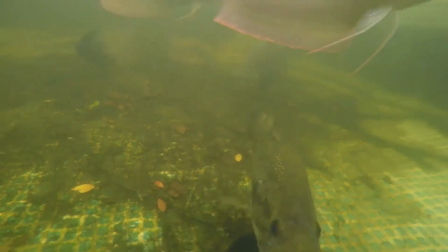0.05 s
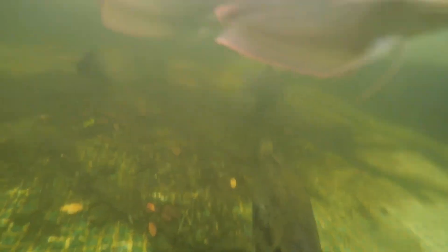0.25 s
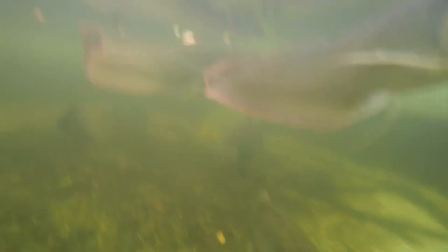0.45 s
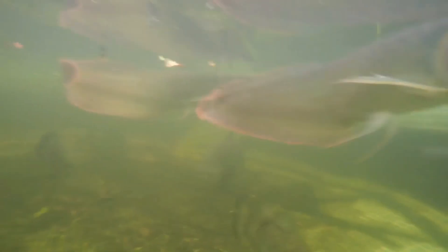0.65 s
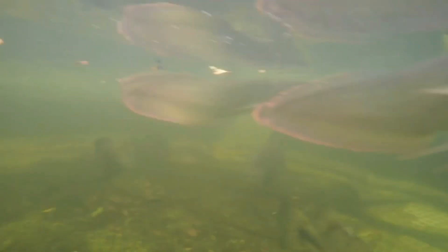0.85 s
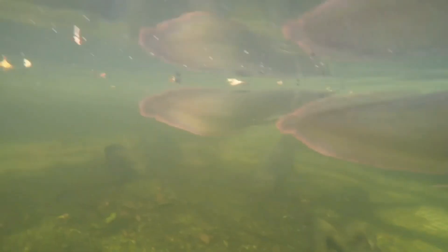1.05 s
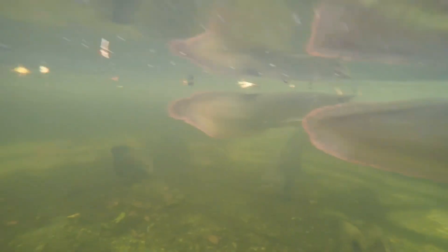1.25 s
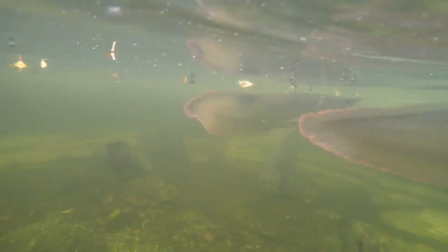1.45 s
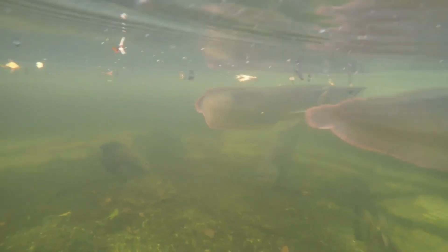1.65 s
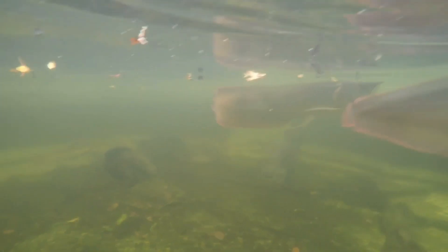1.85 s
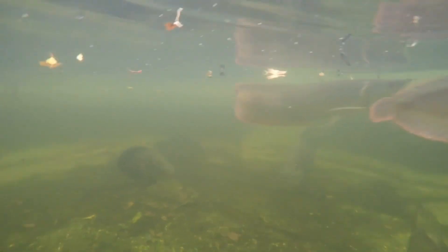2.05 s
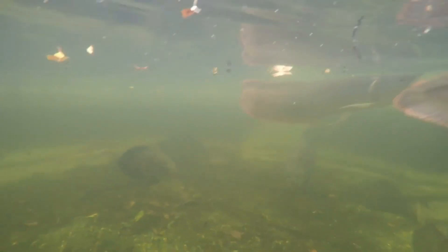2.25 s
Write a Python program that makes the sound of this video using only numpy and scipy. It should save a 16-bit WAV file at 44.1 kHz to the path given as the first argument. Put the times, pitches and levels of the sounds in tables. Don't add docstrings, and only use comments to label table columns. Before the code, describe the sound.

Handling knocks on a sealed plastic housing under water, heard from inside. A faint, buzzy pump hiss and fine watery fizz run throughout. A tick at 0.17 s and a knock at 0.25 lead to brief rubbing; hollow knocks and dull taps cluster from 0.45 to 0.75 amid low sloshing shoves. Bubbles ping faintly. A ringing knock lands at 1.15, then quieter hiss, and a sharp bright click at 1.8.

```python
import sys
import numpy as np
from scipy import signal
from scipy.fft import rfft, irfft
from scipy.io import wavfile
from scipy.ndimage import uniform_filter1d, map_coordinates

SR = 44100
rng = np.random.default_rng(int(sys.argv[2]) if len(sys.argv) > 2 else 0)


def makeup_ratio(level_db):
    decades = np.asarray(level_db, float) / 20
    return 10 ** decades


def unload_audio(sound):
    columns = np.transpose(np.atleast_2d(sound))
    steps = np.round(np.clip(columns, -1, 1) * 32767)
    wavfile.write(sys.argv[1], SR, steps.astype(np.int16))


N = 101429


def evened(x):
    return x / np.sqrt(np.mean(x ** 2) + 1e-20)


def along(curve):
    return np.interp(np.arange(N) / SR, *np.transpose(curve))


def coloured(x, points):
    f, db = np.transpose(points)
    hz = np.fft.rfftfreq(len(x), 1 / SR)
    gain = makeup_ratio(np.interp(np.log(hz + 1), np.log(f + 1), db, left=-60))
    return evened(irfft(rfft(x) * gain, len(x)))


def slow(rate_hz):
    t = np.arange(0, N + 64, 64) / SR
    v = 0
    for f in np.geomspace(rate_hz / 20, rate_hz, num=16):
        v = v + np.sin(2 * np.pi * (f * t + rng.random())) / np.sqrt(f)
    return np.interp(np.arange(N) / SR, t, evened(v))


def resonate(x, hz, width_hz):
    r = np.exp(-np.pi * width_hz / SR)
    return 2 * signal.lfilter([1 - r], [1, -r * np.exp(2j * np.pi * hz / SR)], x).real


def ring(hz, t60, rise_s=0.000063, glide=0.):
    t = np.arange(round(t60 * SR) + 1) / SR
    return (1 - np.exp(-t / rise_s)) * makeup_ratio(-60 * t / t60) * np.sin(2 * np.pi * hz * t * (1 + glide * t))


def add(mix, s, sound):
    part = mix[round(s * SR):][:len(sound)]
    part += sound[:len(part)]


def pump():
    # time_s, level_db
    pump_level = [(0, -41), (.25, -44), (.4, -45), (.6, -46), (.83, -44), (1.04, -48.5), (1.2, -49),
                  (1.4, -46.5), (1.64, -53), (1.85, -50), (2.05, -46.5), (2.3, -43)]
    # pitch_hz, width_hz, level_db
    pond = [(1501, 62, -16), (1804, 27, -13.5), (1964, 57, -11.5), (2150, 17.5, -9), (2260, 56, -12),
            (2440, 52, -3.5), (2600, 23.8, 0.5), (2712, 39, -2), (2910, 22, -10), (3060, 70, -5),
            (3198, 73, 0), (3290, 44, -9), (3644, 98, -8.5), (4650, 204, -18)]
    # time_s, shift_share
    sag = [(0, 0.0042), (1.1, -0.0019), (1.5, -.007), (2.3, -0.0074)]
    bursts_per_s, wander_share, burst_turns = 118.5, .02, .28
    weak_db, uneven_db, pulsed_share = -0.5, 1.5, .72
    drift_db, wide_hz, wide_db = 3.5, 1115, -3.5

    turns = np.cumsum(bursts_per_s * (1 + wander_share * slow(30))) / SR
    burst_db = weak_db * (np.floor(turns) % 2)
    burst_db = burst_db + uneven_db * rng.standard_normal(999)[turns.astype(int)]
    gate = np.exp(-(turns % 1) / burst_turns) * makeup_ratio(burst_db)
    drive = (1 - pulsed_share + pulsed_share * evened(gate)) * rng.standard_normal(N)

    modes = np.zeros(N)
    for k, (hz, width_hz, db) in enumerate(pond):
        mode = resonate(resonate(drive, hz, 0.77 * width_hz), hz, 0.77 * width_hz)
        modes += (-1) ** k * makeup_ratio(db + drift_db * slow(5.34)) * mode
    stretched = np.cumsum(1 + along(sag))
    modes = map_coordinates(modes, [stretched - 1], order=3, mode="nearest")
    wide = resonate(resonate(drive, 2800, wide_hz), 2800, wide_hz)
    buzz = evened(evened(modes) + makeup_ratio(wide_db) * evened(wide))
    return makeup_ratio(along(pump_level) + 1.85 * slow(11)) * buzz


def wash():
    # pitch_hz, level_db
    wash_colour = [(71, -25), (120, -10.5), (1360, -21), (3100, -3.5), (4120, -18.5), (10200, -25.5),
                   (14000, -28.5), (15300, -48)]
    # centre_s, half_width_s, lift_db
    surges = [(.14, 0.015, 5.5), (.2, 0.062, 4), (0.355, 0.024, 6.5), (0.467, 0.022, 7.5),
              (0.512, 0.028, 6), (.72, 0.12, 3), (.85, 0.019, 3), (0.996, 0.019, 6.5), (1.52, 0.0069, 5),
              (1.651, 0.0051, 6.5), (1.688, 0.0044, 3.5), (1.747, 0.0033, -1), (1.812, 0.02, 6.5),
              (2.046, 0.013, 5), (2.144, 0.06, 4), (2.279, 0.0057, 6.5)]
    wash_db, fizz_db, grains_per_s, fizz_hz = -55, -68.5, 1800, 3700

    _, _, z = signal.stft(coloured(rng.standard_normal(N), wash_colour), SR, nperseg=512)
    patches = uniform_filter1d(rng.standard_normal(z.shape), size=30, axis=0)
    patches = evened(uniform_filter1d(patches, size=4, axis=1))
    floor = signal.istft(z * makeup_ratio(2.1 * patches), SR, nperseg=512)[1][:N]

    grains = (rng.random(N) < grains_per_s / SR) * makeup_ratio(1.36 * np.minimum(rng.exponential(1, N), 4))
    puffs = signal.oaconvolve(grains, makeup_ratio(-np.arange(200) * 0.47))[:N] * rng.standard_normal(N)
    fizz = coloured(puffs, [(fizz_hz / 2, -30), (fizz_hz, 0), (9000, -4), (13000, -16)])
    t = np.arange(N) / SR
    lift_db = np.zeros(N)
    for s, half, db in surges:
        side_s = half * np.where(t < s, .6, 1.3)
        lift_db += db * np.exp(-((t - s) / side_s) ** 2)
    return makeup_ratio(wash_db) * evened(floor) + makeup_ratio(fizz_db + 2.45 * lift_db) * fizz


def slosh():
    # time_s, level_db
    slosh_level = [(0, -44), (.2, -43), (.44, -30.5), (.7, -28), (1.2, -38.5), (2.3, -43.5)]
    # pitch_hz, level_db
    slosh_colour = [(4.7, -4), (8.0, 1), (32, 3), (193, -35.5), (300, -73), (390, -61), (660, -120)]
    # start_s, signed_peak, first_swing_hz, t60_s
    shoves = [(0.2497, -.11, 58, .03), (0.2521, -0.093, 124, 0.021), (0.2571, 0.12, 36.6, 0.079),
              (0.337, 0.023, 53, 0.19), (.425, 0.04, 24, .07), (.441, -0.046, 57, 0.085),
              (0.564, 0.014, 71, 0.59), (0.795, 0.054, 28.2, 0.44), (0.5147, -0.064, 44, 0.059),
              (0.655, -0.067, 117, 0.04), (.742, 0.047, 25.8, 0.44), (0.857, 0.1, 36, 0.019),
              (0.937, 0.015, 47.4, 0.43), (1.15, 0.045, 21, 0.073)]
    slowing_per_s = 21.6

    rumble = coloured(rng.standard_normal(N), [*slosh_colour, (500, -106)])
    out = makeup_ratio(along(slosh_level) + 1.84 * slow(8.34)) * rumble
    for s, peak, hz, t60 in shoves:
        t = np.arange(round(t60 * SR)) / SR
        swing = np.sin(2 * np.pi * hz * np.log(1 + slowing_per_s * t) / slowing_per_s)
        add(out, s, 2.58 * peak * swing * (1 - np.exp(-t * hz * 8)) * makeup_ratio(-60 * t / t60))
    return out


def side_trace(heard):
    # pitch_hz, level_db
    trace_colour = [(30, -46), (125, -36.5), (500, -21.5), (1500, -21.5), (3000, -21.5), (6000, -11.5),
                    (12000, -7)]
    gate_level = .25
    hz, t, z = signal.stft(heard, SR, nperseg=512)
    noise = rng.standard_normal(z.shape) + 1j * rng.standard_normal(z.shape)
    blur = uniform_filter1d(abs(z), size=3, axis=0) * noise
    columns = len(t) // 6 + 1
    blocks = rng.standard_normal((9, columns)) + 1.1 * rng.standard_normal(columns)
    is_open = uniform_filter1d(blocks, size=2, axis=0) > gate_level + hz[::32, None] / 20000
    blur *= is_open.repeat(32, 0).repeat(6, 1)[:len(hz), :len(t)]
    f, db = np.transpose(trace_colour)
    gain = makeup_ratio(np.interp(np.log(hz + 1), np.log(f + 1 - 1), db))
    return signal.istft(blur * gain[:, None], SR, nperseg=512)[1][:N]


def bubbles():
    # start_s, peak_db, pitch_hz, t60_s
    pings = [(0.033, -35.5, 5800, 0.022), (.673, -34, 3860, .014), (.678, -25, 3840, 0.015),
             (0.836, -36.5, 5780, 0.011), (0.844, -40, 5640, 0.014), (1.003, -38.5, 4770, 0.029),
             (1.095, -41.5, 4630, 0.028), (1.344, -41, 4350, 0.028), (1.356, -42, 4650, .02),
             (1.5984, -40, 4680, 0.026), (2.136, -54, 9600, 0.034)]
    strays_per_s, stray_db = 17, -59
    rise_per_s, blur_hz = .2, 280

    out = np.zeros(N)
    chances = rng.random((200, 3))[:round(strays_per_s * N / SR)]
    strays = [(a * N / SR, stray_db + 8 * b, 4200 * 1.6 ** c, .025) for a, b, c in chances]
    for s, db, hz, t60 in [*pings, *strays]:
        for late, off in rng.random((4, 2)):
            ping = ring(hz + blur_hz * (off - .5), t60 / 2, rise_s=0.00047, glide=rise_per_s)
            add(out, s + late * t60 * .5, makeup_ratio(db - 4.6 * late) * ping)
    return out


def thuds():
    # start_s, level_db, pitch_hz, t60_s
    blow_modes = [(0.1737, -43.5, 543, 0.025), (0.173, -21, 4410, 0.0065), (0.5108, -21, 1224, 0.015),
                  (0.666, -24, 1400, 0.0066), (1.802, -29.5, 5660, 0.0067), (1.146, -19.5, 6330, 0.0047),
                  (1.2592, -33, 2964, 0.013), (.2485, -20, 449, 0.018), (.2485, -21.5, 707, 0.02),
                  (.2485, -44, 1460, 0.012), (0.5078, -15.5, 346, 0.024), (0.5099, -10, 641, 0.016),
                  (0.51, -8, 1420, 0.0062), (.654, -19.5, 140, 0.045), (.654, -29, 297.6, 0.096),
                  (.6545, -20, 660, 0.013), (0.6542, -16.5, 1560, 0.0063), (0.716, -31, 135, 0.03),
                  (.858, -33.5, 780, 0.033), (.935, -39.5, 190, 0.031), (1.1465, -22.5, 282, 0.021),
                  (1.1467, -21.5, 137, 0.026), (1.1474, -18, 690, 0.012), (1.1468, -23.5, 1470, 0.037),
                  (1.1472, -30, 447, 0.016), (1.8012, -26.5, 1150, 0.0056)]
    out = np.zeros(N)
    for s, db, hz, t60 in blow_modes:
        add(out, s, makeup_ratio(db) * ring(hz, t60, rise_s=0.001))
    return out


def crack(treble_db):
    # pitch_hz, level_db, t60_s
    plastic = [(2760, 11, 0.0064), (3460, 12.5, 0.006), (4045, 2.5, 0.01), (4790, 3, 0.01),
               (5700, -7, 0.0016), (8330, -5, 0.0032), (10500, -11.5, 0.0024), (13400, -30, 0.0017)]
    # after_first_s, level_db
    snaps = [(0, -7), (.0005, 0), (.0016, -8)]
    out = np.zeros(2000)
    for k, (hz, db, t60) in enumerate(plastic):
        lift_db = treble_db * np.clip(np.log2(hz / 3600), 0, 1.3)
        mode = (-1) ** k * ring(hz * rng.uniform(1.0, 1.03), t60, rise_s=0.000067)
        for s, snap_db in snaps:
            add(out, s, makeup_ratio(db + lift_db + snap_db) * mode)
    return out / abs(out).max()


def ticks():
    # start_s, peak_db, extra_treble_db
    sharp = [
        (0.1733, -24.5, 1.5),
        (0.594, -43, 15),
        (1.0505, -33.5, 3),
        (1.1459, -35.5, 16),
        (1.187, -41, -8),
        (1.8004, -14.5, 13),
    ]
    # pitch_hz, level_db
    spray_colour = [(7300, -12), (8300, 0), (11500, -8), (12800, -25)]
    spray_db, spray_t60_s = -45.5, 0.074
    out = np.zeros(N)
    for s, db, treble_db in sharp:
        add(out, s, makeup_ratio(db) * crack(treble_db))
    t = np.arange(4000) / SR
    spray = coloured(rng.standard_normal(4000), spray_colour) * makeup_ratio(spray_db - 60 * t / spray_t60_s)
    add(out, sharp[-1][0], spray)
    return out


def knocks():
    # start_s, ring_db, ring_hz, t60_s, crack_db
    blows = [
        (0.2493, -14, 1220, 0.021, -32.5),
        (0.5094, -10.5, 1122, 0.036, -22),
        (0.6551, -7.5, 1294, 0.014, -24.5),
        (0.6599, -20, 1256, 0.015, -38),
        (1.1458, -11.5, 1189, 0.047, -15.5),
    ]
    out = np.zeros(N)
    for s, db, hz, t60, crack_db in blows:
        add(out, s, makeup_ratio(db) * ring(hz, t60, rise_s=0.0023))
        add(out, s, makeup_ratio(crack_db) * crack(-6))
    return out


def rubs():
    # start_s, length_s, level_db, brightest_hz
    strokes = [
        (0.255, 0.087, -47.5, 1240),
        (0.441, 0.067, -48.5, 2220),
        (.44, 0.033, -49.5, 600),
        (0.482, 0.029, -47, 600),
        (0.52, 0.13, -54.5, 830),
        (0.659, 0.042, -42.5, 1000),
        (0.708, 0.042, -48.5, 800),
        (0.83, 0.044, -52, 1180),
        (1.14, 0.035, -46.5, 390),
    ]
    slips_per_s, count = 1400, round(.2 * SR)
    out, t = np.zeros(N), np.arange(count) / SR
    for s, length, db, hz in strokes:
        sizes = makeup_ratio(2.0 * np.minimum(rng.exponential(1, count), 3))
        slips = (rng.random(count) < slips_per_s / SR) * sizes * rng.choice([-1, 1], count)
        body = coloured(slips, [(120, -10), (hz * 0.73, -5), (hz, 0), (hz + 400, -7), (5000, -26)])
        swell = np.sqrt(np.sin(np.pi * np.clip(t / length, 0, 1)).clip(0))
        add(out, s, makeup_ratio(db) * body * swell)
    return out


def squeak():
    centre_s, half_s, level_db, hz, wide_hz = 0.293, 0.032, -46.5, 1810, 259
    slip = resonate(resonate(rng.standard_normal(N), hz, wide_hz), hz, wide_hz)
    t = np.arange(N) / SR
    return makeup_ratio(level_db) * evened(slip) * np.exp(-((t - centre_s) / half_s) ** 4)


def taps():
    # start_s, peak_db, width_ms
    touches = [(0.455, -35, 1.6), (.468, -35, 0.76), (0.4876, -42, 1.5), (0.4986, -24, 3),
               (0.503, -33, 3.4), (0.5068, -18.5, 1.9), (0.587, -33, 0.82), (0.6648, -35, 1),
               (0.6687, -16.5, 1.8), (0.673, -40, 0.67), (.677, -17, 2.3), (0.6831, -34, 1.1),
               (.687, -29, 0.97), (0.7183, -35, 1.6), (0.7197, -20.5, 1.9), (0.725, -35, 1.2),
               (0.7333, -22.5, 2.2), (0.7381, -34, 0.5), (.861, -26.5, 3.8)]
    ring_hz, ring_db, ring_t60_s = 672, -14, 0.014
    out = np.zeros(N)
    for s, db, ms in touches:
        u = np.arange(800) / SR / (ms / 3000)
        add(out, s - ms / 3000, makeup_ratio(db + 5.5) * u ** 2 * (1 - u / 4) * np.exp(-u))
        add(out, s, makeup_ratio(db + ring_db) * ring(ring_hz * rng.uniform(1.0, 1.13), ring_t60_s))
    return out


def scene():
    water = pump() + wash() + slosh()
    close = bubbles() + thuds() + ticks() + knocks() + rubs() + squeak() + taps()
    mid = water + close
    side = side_trace(water + makeup_ratio(-29) * close)
    return np.array([mid + side, mid - side])


def roll_off(x):
    return signal.sosfilt(signal.butter(12, 15560, fs=SR, output="sos"), x)


def record(dry):
    # pitch_hz, share_0_to_1
    kept = [(6000, 1), (9000, .92), (11000, .62), (12200, .36), (14200, .2), (14700, 0)]
    hz, t, z = signal.stft(dry, SR, window="cosine", nperseg=2048)
    power = uniform_filter1d(abs(z[0]) ** 2, size=7, axis=0)
    level = np.log(uniform_filter1d(power, size=2, axis=1) + 1e-20)
    drift = uniform_filter1d(rng.standard_normal(level.shape), size=24, axis=0)
    drift = evened(uniform_filter1d(drift, size=3, axis=1))
    standing_out = level - uniform_filter1d(level, size=300, axis=0) + .45 * drift
    rank = np.argsort(np.argsort(standing_out, axis=1), axis=1) / len(t)
    keep = rank >= 1 - np.interp(hz, *np.transpose(kept))[:, None]
    treble = (abs(z[0, hz > 6000]) ** 2).sum(0)
    keep |= (treble > 12 * np.median(treble)) & (hz < 15500)[:, None]
    gated = signal.istft(z * keep, SR, window="cosine", nperseg=2048)[1][:, :N]
    return roll_off(gated)


dry = scene()
out = record(dry)
unload_audio(out)
```